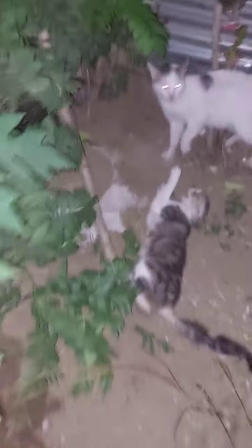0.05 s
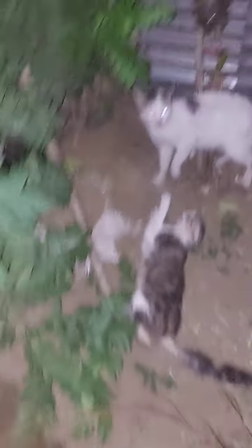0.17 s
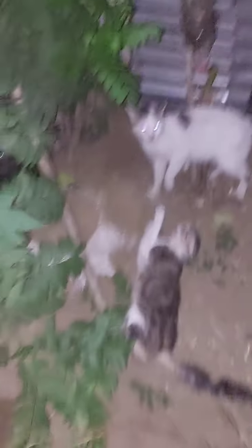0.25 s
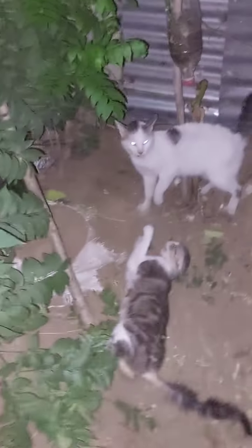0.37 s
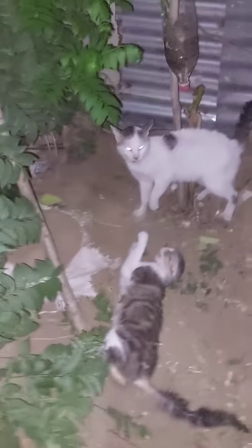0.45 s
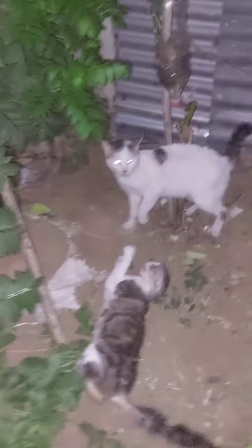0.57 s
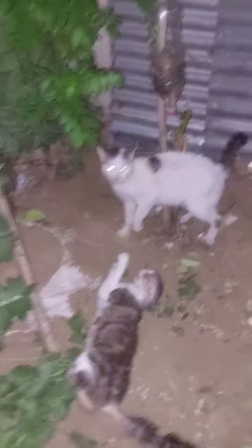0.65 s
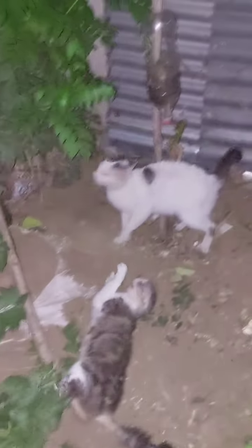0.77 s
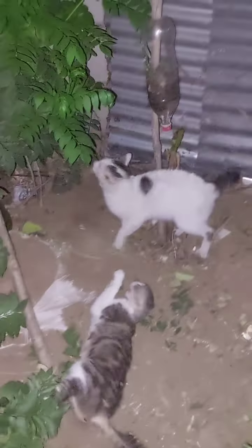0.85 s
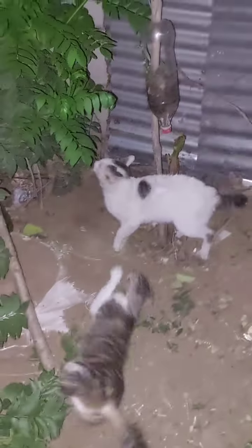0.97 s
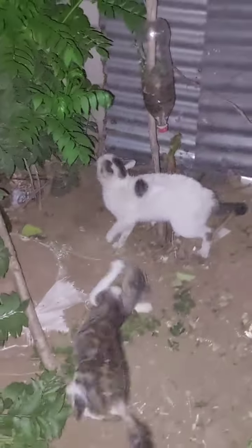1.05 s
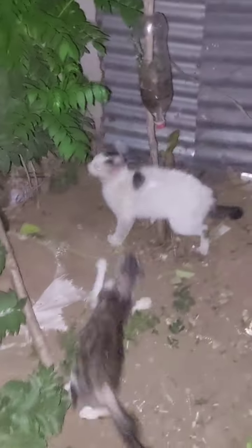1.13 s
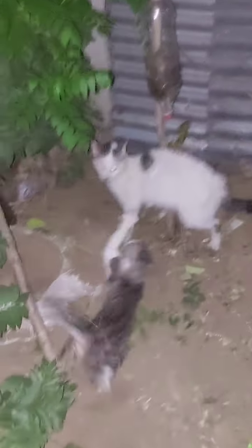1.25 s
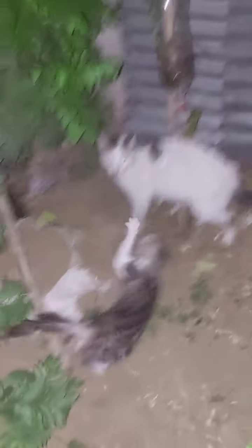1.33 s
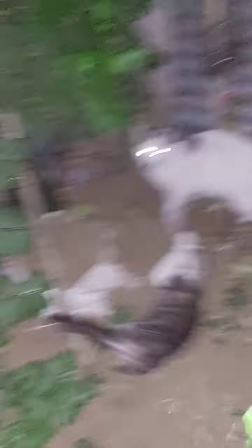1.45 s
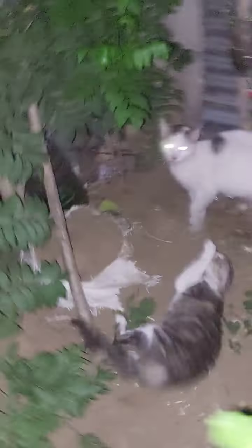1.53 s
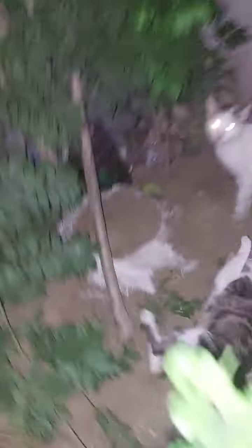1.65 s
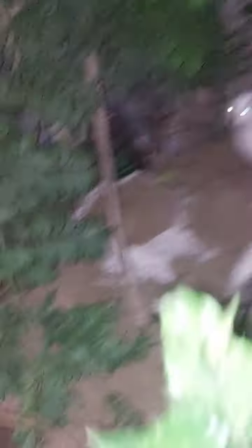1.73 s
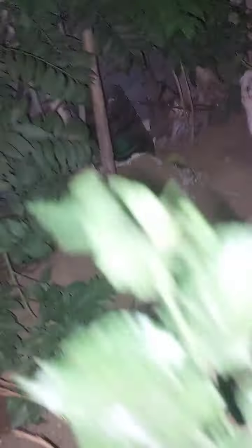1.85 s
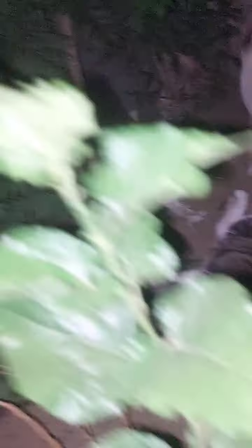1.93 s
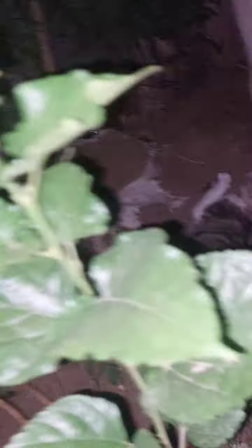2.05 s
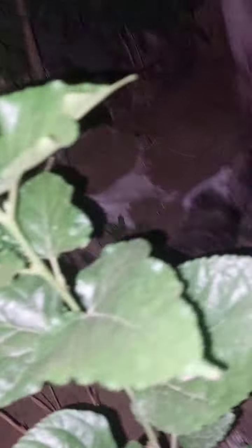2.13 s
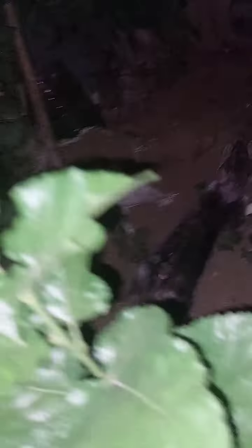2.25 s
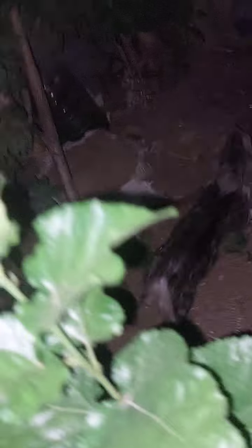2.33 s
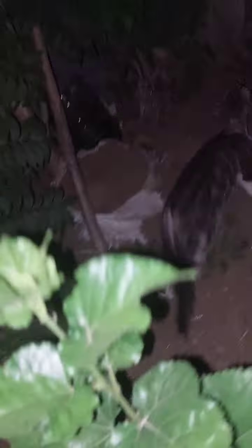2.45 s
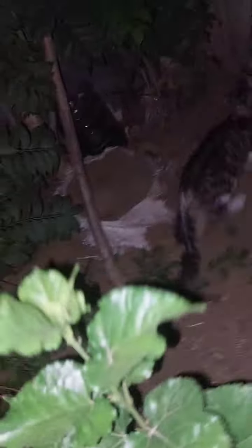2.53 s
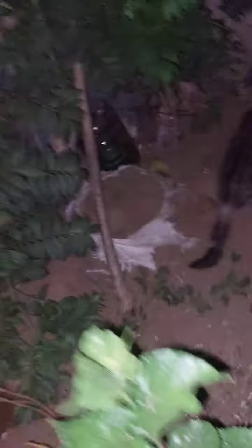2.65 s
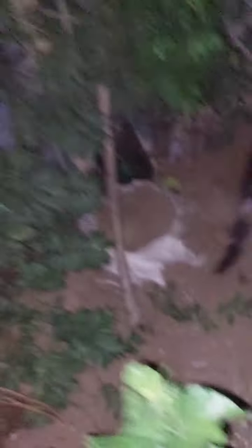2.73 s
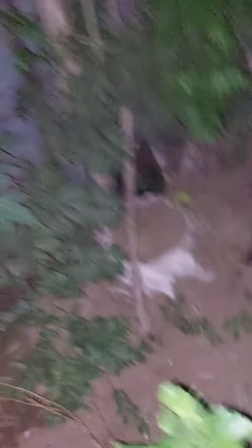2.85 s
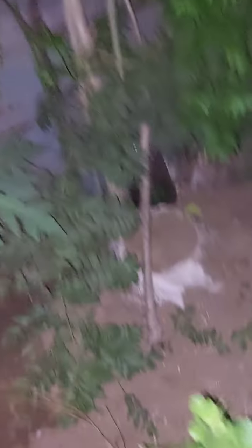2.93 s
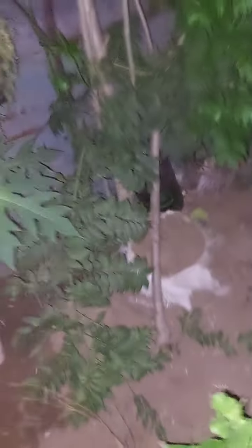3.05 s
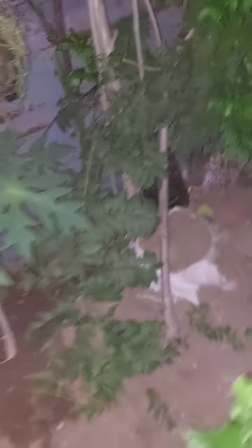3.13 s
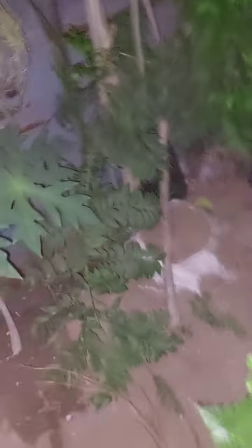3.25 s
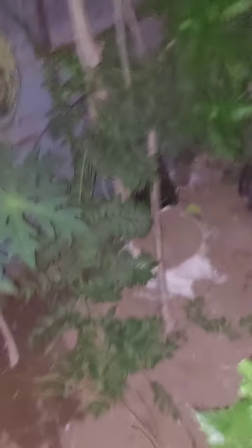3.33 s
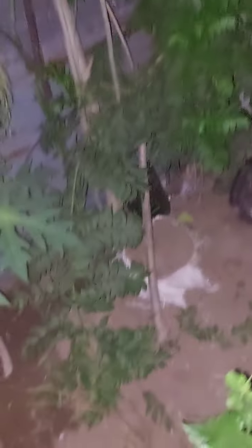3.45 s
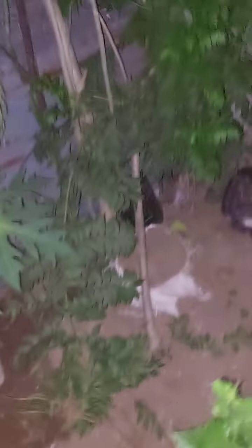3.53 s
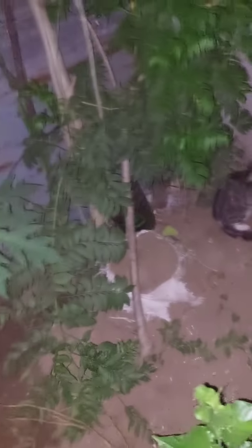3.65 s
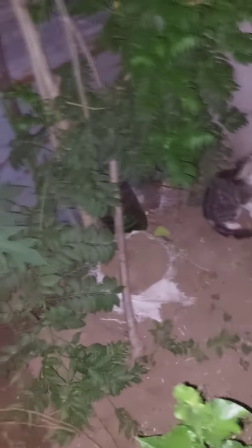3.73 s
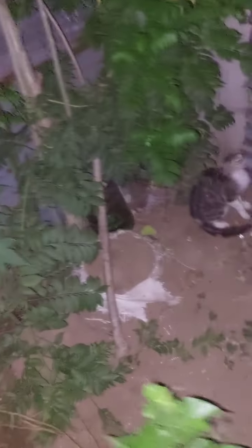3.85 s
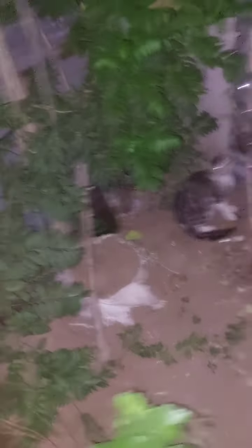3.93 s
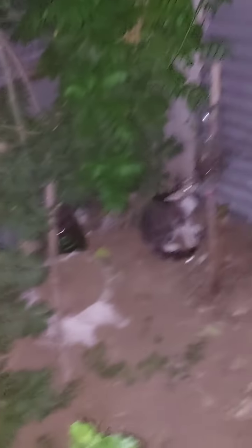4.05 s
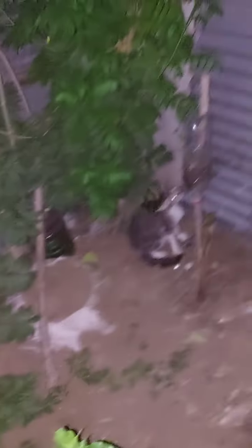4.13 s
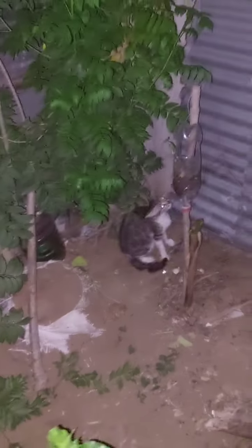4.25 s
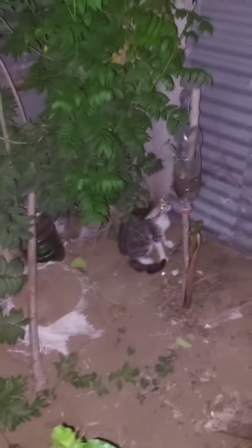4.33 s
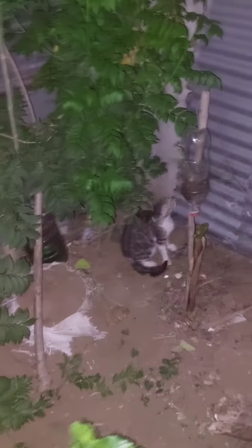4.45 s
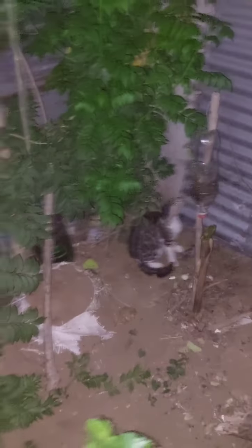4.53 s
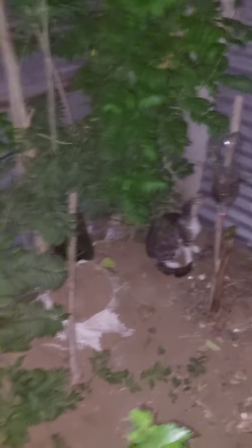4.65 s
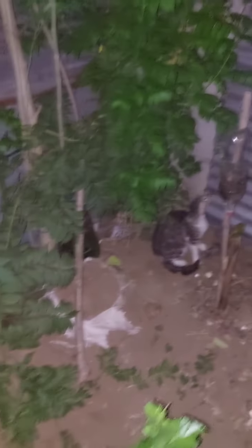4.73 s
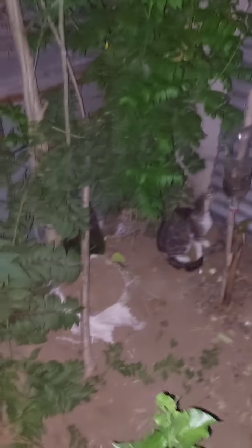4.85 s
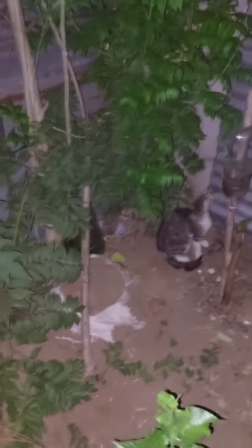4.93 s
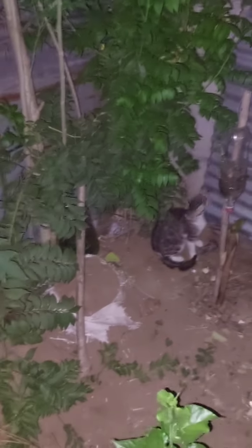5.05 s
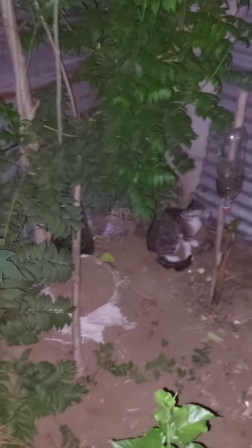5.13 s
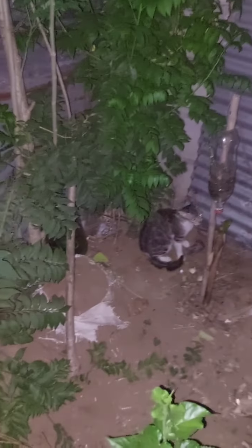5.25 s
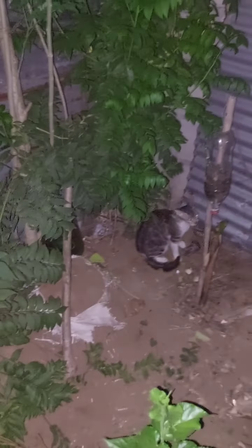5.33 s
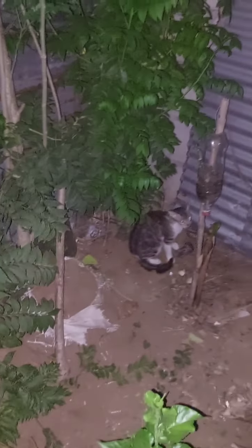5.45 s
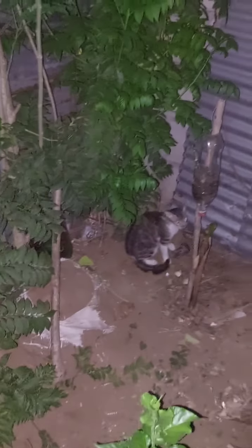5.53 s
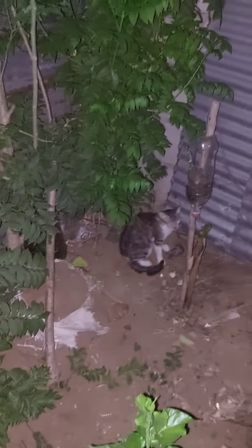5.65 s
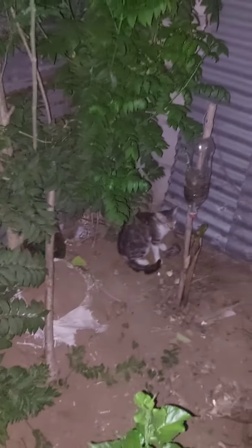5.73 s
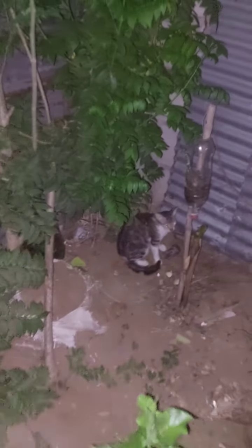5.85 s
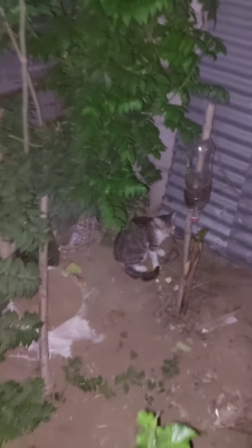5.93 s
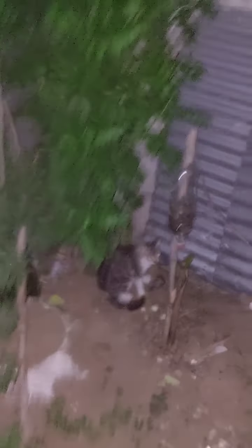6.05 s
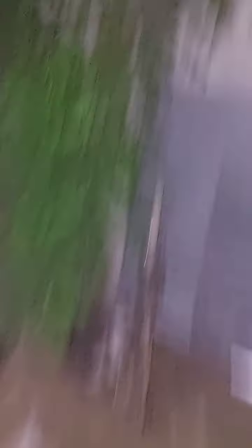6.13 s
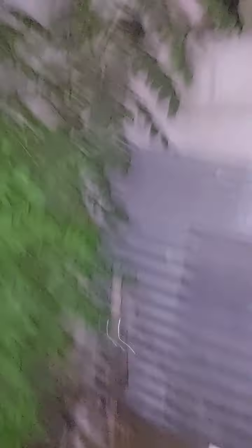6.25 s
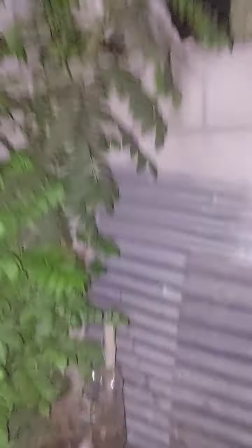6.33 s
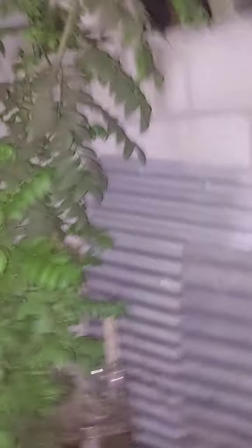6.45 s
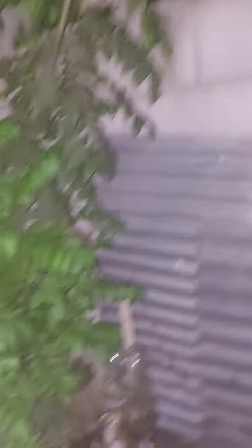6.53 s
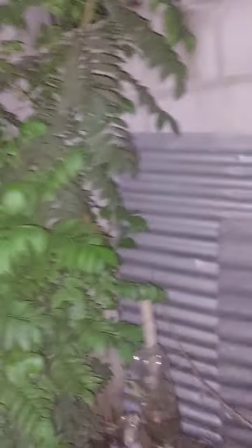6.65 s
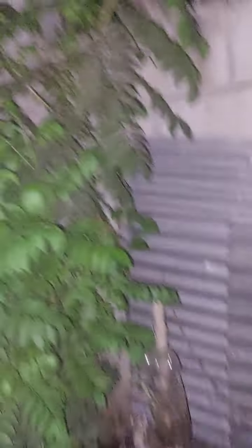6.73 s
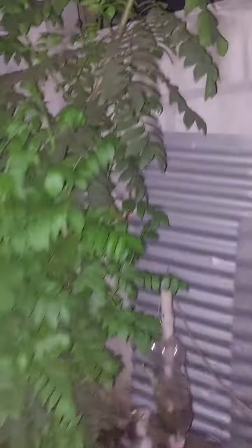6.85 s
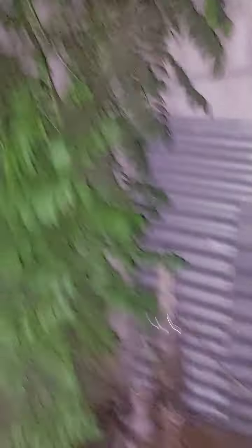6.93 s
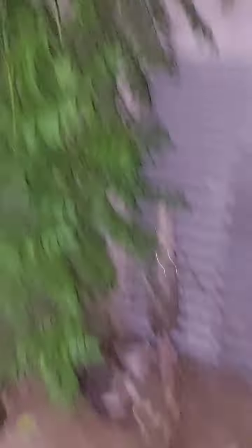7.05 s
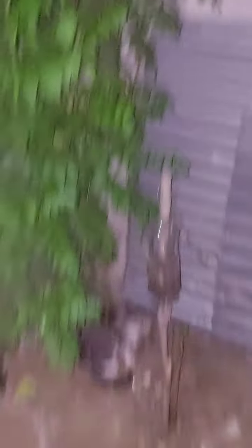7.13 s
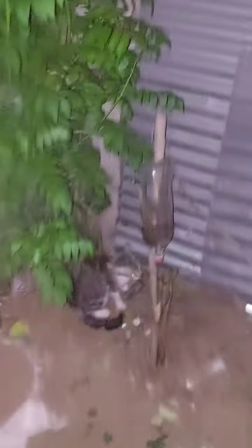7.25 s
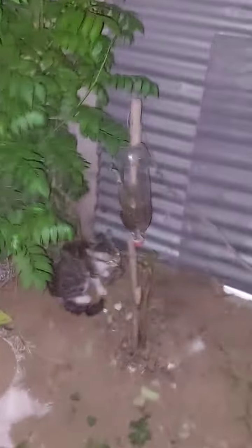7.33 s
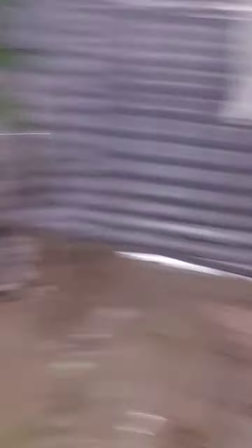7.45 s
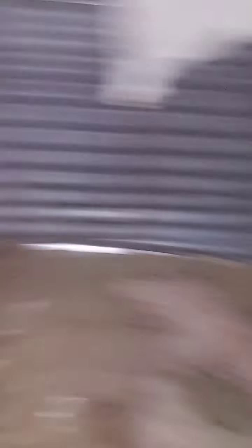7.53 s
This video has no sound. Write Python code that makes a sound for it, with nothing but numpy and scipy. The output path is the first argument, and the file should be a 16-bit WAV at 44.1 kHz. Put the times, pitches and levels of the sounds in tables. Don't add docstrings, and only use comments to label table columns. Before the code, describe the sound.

One drawn-out cat yowl, clear then rough and broken, ends in a rapid knocking on a stake. Claws and bodies slam and scrape slack sheet metal for about two seconds, ringing sharply. Afterwards the yard is quiet: crickets shimmer, a nearer one chirps, dogs bark far down an echoing street over faint traffic, and fingers bump the phone. The right channel carries everything; the left has low electronic noise.

```python
import sys
import numpy as np
from scipy import signal
from scipy.fft import rfft, irfft, next_fast_len
from scipy.io import wavfile
from scipy.ndimage import uniform_filter1d, map_coordinates

SR = 44100
rng = np.random.default_rng(int(sys.argv[2]) if len(sys.argv) > 2 else 0)


def magnitude_from_level(level_db):
    exponent = np.asarray(level_db, float) / 20
    return 10 ** exponent


def transcribe(signal):
    frames = np.atleast_2d(signal).T
    limited = np.clip(frames, -1, 1)
    pcm = np.round(limited * 32767).astype(np.int16)
    wavfile.write(sys.argv[1], SR, pcm)


N = 334260
T = np.arange(N) / SR

# [f/Hz, t60/s]
YARD_DECAY = [(200, .25), (2000, .28), (10000, .14)]
# [f/Hz, level/dB]
AIR_TREBLE = [(5290, -33.5), (9000, 4), (10500, -7.5), (12000, 2.5), (14500, -1.5), (15900, 1)]


def unit(x):
    return x / np.sqrt(np.mean(x ** 2) + 1e-20)


def along(points, hz):
    f, v = np.transpose(points)
    return np.interp(np.log(hz + 1), np.log(f + 1), v)


def curves(rows):
    s, *cols = np.transpose(rows)
    return [np.interp(T, s, c) for c in cols]


def wobble(rate):
    knots = rng.standard_normal(int(N * rate / SR) + 4)
    return map_coordinates(knots, [T * rate])


def filtered(x, response):
    m = next_fast_len(N + SR // 2)
    return irfft(rfft(x, m) * response(np.fft.rfftfreq(m, 1 / SR)), m)[:N]


def hiss(spectrum, lo_hz=0, hi_hz=SR, source=None):
    x = rng.standard_normal(N) if source is None else source

    def response(hz):
        edges = (1 + (lo_hz / (hz + 1)) ** 12) * (1 + (hz / hi_hz) ** 12)
        return magnitude_from_level(along(spectrum, hz)) / np.sqrt(edges)

    return unit(filtered(x, response))


def struck(size, spread_db, keep, patchy_db):
    z = signal.stft(rng.standard_normal(N), nperseg=size)[2]
    patches = uniform_filter1d(rng.standard_normal(z.shape), 9, 0)
    patches = unit(uniform_filter1d(patches, 9, 1))
    blows = magnitude_from_level(spread_db * rng.standard_normal(z.shape) + patchy_db * patches)
    ring = signal.lfilter([1], [1, -np.clip(keep, 0, .95)], blows ** 2, axis=1)
    return signal.istft(z * np.sqrt(ring), nperseg=size)[1][:N]


def echoes(x, decay):
    hz, t, z = signal.stft(rng.standard_normal(SR), SR, nperseg=256)
    tail = signal.istft(z * magnitude_from_level(-60 * t / along(decay, hz)[:, None]), SR, nperseg=256)[1]
    return signal.fftconvolve(x, tail / np.linalg.norm(tail))[:N]


def voice(pitch, rough, half, tract, mouth, held, shimmer_db, jitter, breath, count):
    shake = .004 * wobble(60) + jitter * rough * (wobble(45) + wobble(120)) / 1.3
    cycles = np.cumsum(pitch * (1 + shake)) / SR
    out = np.zeros(len(pitch))
    for k in np.arange(1, 2 * count + 1) / 2:
        level = held.get(k, along(tract, k * pitch))
        level = level + shimmer_db * (wobble(9) + 6 * rough * wobble(60))
        tone = np.sin(2 * np.pi * (k * cycles + rng.random()))
        out += (half if k % 1 else 1) * magnitude_from_level(level) * tone
    out /= np.sqrt(np.abs(uniform_filter1d(out ** 2, 1000)) + 1e-12)
    air = hiss(mouth) * (1 + np.cos(2 * np.pi * cycles))
    flutter = magnitude_from_level(7 * rough * wobble(260).clip(-3, 1.1))
    return out * flutter + breath * rough ** 1.5 * air


def bursts(rows, swell_db, upper_swell_db, faster):
    low, high = np.zeros(N), np.zeros(N)
    for s, swell_s, db, upper_db, dying in rows:
        on = np.clip((T - s) / .006, 0, 1)
        to_go = np.clip(1 - (T - s) / swell_s, 0, 1)
        after = (T - s - swell_s).clip(0)
        low += (on * magnitude_from_level(db - swell_db * to_go - dying * after)) ** 2
        high += (on * magnitude_from_level(db + upper_db - upper_swell_db * to_go - faster * dying * after)) ** 2
    return np.sqrt(low), np.sqrt(high)


def rings(events, crack, lift_db, spread, loose):
    out, t = np.zeros(N + SR), np.arange(SR // 2) / SR
    for s, db, hz, t60 in events:
        modes_hz = hz * (1 + spread * rng.standard_normal((24, 1)))
        ring = np.sin(2 * np.pi * (modes_hz * t + loose * rng.random((24, 1)))).sum(0) / 4.5
        ring *= magnitude_from_level(-60 * t / t60 + 3 * wobble(250)[:len(t)])
        ring *= 1 - np.exp(-hz * t / 12)
        snap = crack * .06 / t60 * rng.standard_normal(len(t)) * magnitude_from_level(-60 * t / .01)
        out[round(s * SR):][:len(t)] += magnitude_from_level(db + lift_db) * (ring + snap)
    return out[:N]


def yowl():
    # [t/s, pitch f/Hz, level/dB, mouth opening/dB]
    wail = [
        (0, 575.6, -24.5, -3),
        (.134, 547, -25, 2.5),
        (.2, 552.8, -23, -8),
        (.332, 541, -29.5, 1),
        (.49, 532.4, -28, -1.5),
        (.655, 538.7, -29, 7),
        (.74, 562.6, -24, 1),
        (.9, 703.4, -24.5, -6.5),
        (.957, 810.5, -23.5, -3),
    ]
    # [t/s, from f/Hz, to f/Hz, level/dB, mouth opening/dB]
    breaks = [(.962, 802, 766.3, -26, 0), (.972, 694, 625.6, -30, -0.5), (1.011, 633, 590.5, -30.5, 1.5),
              (1.044, 595.6, 617, -28, -3), (1.065, 606, 610.6, -33, 0), (1.09, 625.4, 670, -27.5, -4),
              (1.112, 648.6, 698.2, -28, -5.5), (1.138, 395.6, 405.6, -26, -8.5),
              (1.193, 594, 611.2, -26.5, -4), (1.212, 561.5, 540, -24, 3.5),
              (1.232, 572, 616.6, -25.5, -3.5), (1.258, 601.4, 555.8, -28, 7.5),
              (1.292, 522, 509.3, -25, -2.5)]
    # [t/s, added roughness 0-1]
    jolts = [(.752, .16), (.79, .1), (.825, .08), (.94, .25), (.968, .15), (1.09, .06), (1.134, .38),
             (1.165, .3), (1.215, .14), (1.255, .33), (1.285, .25)]
    # [f/Hz, level/dB]
    throat = [(200, -66), (340, -11.5), (540, -31), (1080, -24.5), (1500, -12.5), (1700, 3), (2050, 4.5),
              (2300, -16.5), (3300, -36.5), (3900, -54.5), (5000, -36.5), (6300, -53), (10000, -74.5),
              (12800, -55.5), (15000, -64)]
    # [f/Hz, level/dB]
    scream = [(300, -28), (600, -27), (1200, -17), (1650, 0), (1950, 3), (2250, -5), (2600, -13),
              (3300, -14), (3900, -22), (4400, -32), (5000, -23), (5500, -30), (6300, -46), (9000, -56)]
    # [f/Hz, level/dB]
    snarl = [(200, -53), (350, -26), (900, -30), (1600, -2), (2100, -5), (2600, -21), (3500, -7),
             (4200, -17), (5200, -24), (9000, -42)]
    open_mouth = {4: -20, 5: -18.5, 6: -20.5, 7: -38, 8: -39.5, 9: -33.5}
    end_s, hoarse_s, ease_s = 1.31, .745, .045

    ends = [row[0] for row in breaks[1:]] + [end_s]
    path = list(wail)
    for (s, hz, end_hz, db, wide), end in zip(breaks, ends):
        path += [(s, hz, db, wide), (end - 1e-4, end_hz, db, wide)]
    pitch, db, open_db = uniform_filter1d(curves(path), size=220)
    last_s = breaks[-1][0]
    db += -3 * np.clip((T - last_s) / (end_s - last_s), 0, 1)

    jolt = sum(size * (T > s) * np.exp(-(T - s).clip(0) / ease_s) for s, size in jolts)
    jolt = uniform_filter1d(jolt, size=600)
    turned = np.clip((T - hoarse_s) / ease_s, 0, 1)
    rough = .015 + .11 * turned + jolt

    held = {}
    for k in np.arange(1, 33) / 2:
        clear = open_mouth[k] + open_db if k in open_mouth else along(throat, k * pitch)
        upper = np.clip(k * pitch / 600 - 3, 0, 1) * np.clip(8 - k * pitch / 600, 0, 1)
        hoarse = along(scream, k * pitch) + open_db * upper
        held[k] = turned * hoarse + (1 - turned) * clear
    gate = np.clip((end_s + .01 - T) * 200, 0, 1)
    cry = voice(pitch, rough, .8 * jolt, throat, snarl, held, shimmer_db=2, jitter=.06, breath=.65, count=27)
    return gate * magnitude_from_level(db) * cry


def shaken_sheet():
    # [t/s, swell/s, boom level/dB, rattle over boom/dB, dying/(dB/s)]
    shoves = [(1.398, 0.037, -44.5, 2, 193), (1.705, 0.032, -49, 5, 68.5), (1.82, 0.32, -43, 0.5, 140),
              (2.17, 0.14, -35.5, 7, 64.5), (2.25, 0.13, -32.5, 8.5, 54), (2.55, 0.036, -43, 6, 18.5),
              (2.66, 0.15, -34.5, -20.5, 62), (2.776, 0.014, -34.5, 2, 63), (2.82, 0.18, -33.5, 9, 77.5),
              (3.062, 0.019, -35.5, 7.5, 45.5), (3.18, 0.07, -24.5, 1.5, 78), (3.442, 0.0048, -40, 2, 64),
              (3.545, 0.014, -41.5, 2, 86), (3.7, 0.1, -40.5, 1.5, 69)]
    # [t/s, swell/s, scrape level/dB, jingle over scrape/dB, dying/(dB/s)]
    rakes = [(1.395, 0.05, -55, 0, 260), (1.702, 0.0071, -46.5, 2.5, 101.5), (1.74, .03, -64, 10, 124),
             (1.82, 0.34, -46, 0.5, 64), (2.168, 0.013, -30, 6, 63.5), (2.2, 0.045, -27, 1.8, 77),
             (2.3, 0.071, -28.5, 2.5, 131), (2.545, .055, -40.5, 7, 88.5), (2.775, .004, -47.5, -13.5, 60),
             (2.805, 0.13, -30, -4, 114.5), (2.9, 0.043, -27.5, -13, 269), (3.062, 0.0091, -32, -6, 119.5),
             (3.18, .06, -32.5, -1.5, 147), (3.442, .006, -40.5, 6.5, 212.5),
             (3.545, .012, -47.5, -0.5, 155), (3.7, 0.027, -49.5, 4, 60.5), (3.74, 0.028, -39.5, -4.5, 119)]
    # [f/Hz, level/dB]
    ribs = [(350, -32.5), (600, -14.5), (758, 0), (1680, -2), (1980, 0), (2570, -8), (3930, 2.5),
            (7280, -10), (8230, -22.5), (12800, -15.5), (15900, -30.5)]
    # [f/Hz, level/dB]
    slack = [(18, -58), (30, -35), (60, -6), (123, -11), (226, -0.5), (678, -7.5), (800, -19),
             (1040, -34.5), (1760, -120)]
    boom_gain, rattle_gain = bursts(shoves, swell_db=6, upper_swell_db=11, faster=1.81)
    scrape_gain, jingle_gain = bursts(rakes, swell_db=8.5, upper_swell_db=8.5, faster=1.37)
    grit = magnitude_from_level(1.9 * wobble(50) + 1.4 * wobble(700) + 8 * (wobble(500) - 2).clip(0, .8))
    boom = hiss(slack, 0, 700, struck(size=1024, spread_db=2.5, keep=.4, patchy_db=1.5))
    boom *= magnitude_from_level(2.5 * wobble(30))
    rattle = hiss(ribs, 700, 2800, struck(size=512, spread_db=3.5, keep=.6, patchy_db=3)) * np.sqrt(grit)
    scrape = hiss(ribs, 2800, 8500, struck(size=512, spread_db=3.5, keep=.6, patchy_db=3.2)) * grit
    jingle = hiss(ribs, 8500, SR, struck(size=256, spread_db=4, keep=.75, patchy_db=3)) * grit
    shoved = boom_gain * unit(boom) + rattle_gain * unit(rattle)
    return shoved + scrape_gain * unit(scrape) + jingle_gain * unit(jingle)


def fence_contacts():
    # [t/s, peak level/dB, ring f/Hz, t60/s]
    stake = [
        (1.4068, -28, 1445, 0.015),
        (1.4176, -29.5, 1460, 0.039),
        (1.4324, -20.5, 1570, 0.012),
        (1.4443, -25.5, 1750, 0.011),
        (1.4527, -30.5, 1650, 0.024),
        (1.5409, -44, 1280, 0.0097),
    ]
    # [t/s, peak level/dB, ring f/Hz, t60/s]
    claws = [(1.708, -26, 2050, 0.014), (1.7659, -15.5, 11600, 0.014), (1.8855, -37.5, 4040, 0.2),
             (1.9071, -32, 2180, 0.06), (2.18, -11.5, 11450, 0.13), (2.1803, -12.5, 7310, .08),
             (2.1987, -11.5, 3770, 0.2), (2.205, -11.5, 6276, .15), (2.2596, -12, 10300, 0.3),
             (2.285, -10.5, 10170, .2), (2.26, -9.5, 12300, .04), (2.2, -13.5, 12180, .15),
             (2.2855, -10, 5260, .08), (2.29, -15.5, 7090, .2), (2.355, -10.5, 2051, .15),
             (2.385, -12.5, 1970, .15), (2.435, -23, 4960, .25), (2.5739, -20, 7500, .15),
             (2.59, -23, 6400, .2), (2.585, -20.5, 13170, .1), (2.6642, -31, 3180, .06),
             (2.69, -27, 12800, .2), (2.7006, -27, 3086, .06), (2.8163, -20.5, 4690, .15),
             (2.8333, -19.5, 2730, .12), (2.93, -14.5, 4080, 0.29), (2.962, -11, 2048, 0.34),
             (2.945, -15.5, 4980, .2), (2.97, -17, 2950, 0.29), (3.2379, -23.5, 3060, .12),
             (2.3523, -5, 11700, 0.11), (2.386, -4.5, 12960, 0.16), (2.5488, -25, 9230, 0.17),
             (2.6349, -16.5, 12170, 0.015), (2.779, -27.5, 1930, 0.05), (2.814, -19.5, 1700, 0.18),
             (2.8971, -23, 4797, 0.7), (3.0701, -20.5, 2023, 0.22), (3.1857, -17, 2065, 0.1),
             (3.4439, -26, 4790, 0.12), (3.5558, -34, 1850, 0.17), (3.722, -35, 7380, 0.25),
             (3.7883, -36, 2060, 0.062), (3.8861, -32.5, 3920, 0.1), (3.928, -49.5, 3800, 0.16),
             (4.165, -36.5, 3700, 0.0067)]
    # [t/s, peak level/dB, ring f/Hz]
    tips = [(1.7175, -29, 4300), (1.7514, -28, 4800), (1.7655, -17, 8000), (1.9051, -28, 2900),
            (2.1694, -24, 6000), (2.7766, -27.5, 3900), (2.816, -26.5, 4670), (2.3575, -9.5, 11200),
            (2.3925, -7, 12700), (3.63, -22, 4500), (1.3, -30, 2600), (4.13, -52, 4530),
            (3.9594, -45.5, 3470), (4.0594, -49, 4010), (4.37, -50.5, 4690)]
    # [t/s, peak level/dB, ring f/Hz, t60/s]
    low_rings = [
        (1.403, -28, 289, .15),
        (1.44, -36, 252, .15),
        (1.752, -34, 345, .1),
        (1.85, -36.5, 273.5, .4),
        (2.07, -30, 276.5, .4),
        (2.695, -23, 249, .2),
        (2.78, -22, 332, .2),
        (3.2, -24.5, 275, .3),
    ]
    out = rings(claws, crack=.11, lift_db=-9, spread=.028, loose=.5)
    out += rings(stake, crack=.015, lift_db=-1, spread=.04, loose=0)
    out += rings([(s, db, hz, .02) for s, db, hz in tips], crack=.15, lift_db=-4, spread=.13, loose=1)
    return out + rings(low_rings, crack=0, lift_db=-2, spread=.04, loose=.97)


def hand():
    # [t/s, swell/s, thud level/dB, brush over thud/dB, dying/(dB/s)]
    shifts = [
        (6.205, .03, -45, -3.5, 88),
        (6.25, .168, -26.5, -34.5, 797),
        (6.7, 0.039, -55, 3.5, 100),
        (6.99, .056, -46, -25.5, 269.5),
    ]
    # [t/s, peak level/dB, ring f/Hz, t60/s]
    taps = [
        (6.322, -41.5, 1310, 0.13),
        (6.193, -44.5, 2100, .03),
        (6.217, -42, 3820, 0.032),
        (6.24, -48.5, 2400, 0.039),
        (6.24, -45.5, 1610, 0.059),
        (6.73, -45, 2330, .08),
        (7.02, -46.5, 700, 0.091),
        (7.03, -41, 220, .12),
    ]
    # [f/Hz, level/dB]
    skin = [(530, -13.5), (900, -4), (1320, -6), (1620, -3.5), (2650, -12.5), (3900, -9), (6300, -13.5),
            (7550, -4), (8410, -15.5), (15900, -16)]
    # [f/Hz, level/dB]
    case = [(15, -41), (25, 1), (139, -4), (221, -18.5), (339, -28), (476, -57), (500, -33), (650, -58),
            (1100, -120)]
    press, slide = bursts(shifts, swell_db=16.5, upper_swell_db=10, faster=2.5)
    thud = press * magnitude_from_level(1.9 * wobble(25)) * hiss(case)
    brush = hiss(skin, source=struck(size=256, spread_db=2.5, keep=.6, patchy_db=2.5))
    brush *= magnitude_from_level(3 + 1.5 * wobble(80))
    fanned = magnitude_from_level(-11) * hiss(AIR_TREBLE)
    return thud + slide * (brush + fanned) + rings(taps, crack=.1, lift_db=3.5, spread=.029, loose=.87)


def barks():
    # [t/s, swell/s, chest level/dB, open mouth over chest/dB, dying/(dB/s)]
    calls = [
        (5.11, 0.05, -45.5, -3, 231),
        (5.545, 0.041, -38.5, -11, 108),
        (5.72, 0.113, -48.5, -12, 161),
        (6.59, 0.09, -45.5, -7, 239),
    ]
    # [f/Hz, level/dB]
    muzzle = [(180, -57), (330, -48), (450, 5), (650, 11), (850, 16.5), (1100, 13), (1400, -20.5),
              (1800, -7), (2300, -30), (4000, -30)]
    # [f/Hz, level/dB]
    round_muzzle = [(180, -52), (330, -21), (450, -15.5), (560, 0), (670, 1.5), (870, 6), (1100, -11),
                    (1450, -19), (1800, -21), (2300, -33.5), (2700, -46), (4000, -56)]
    round_s, whine_s, end_s = 5.45, 5.72, 6.3
    gains = bursts(calls, swell_db=14, upper_swell_db=17, faster=.61)
    chest, mouth = uniform_filter1d(gains, size=900)
    whine = np.clip((T - whine_s) * 40, 0, 1) * (T < end_s)
    pitch = 221 + 50 * whine + 6 * wobble(8)
    long = (T > round_s) * (T < end_s)
    held = {}
    for k in np.arange(1, 25) / 2:
        held[k] = np.where(long, along(round_muzzle, k * pitch), along(muzzle, k * pitch))
    rough = np.where(long, .3, .35)
    half = uniform_filter1d(np.where(long * (T > whine_s), .25, .64), size=1500)
    bark = voice(pitch, rough, half, muzzle, muzzle, held, shimmer_db=3, jitter=.087, breath=.7, count=12)
    flat = [(1, 0)]
    return chest * hiss(flat, 0, 668, bark) + mouth * hiss(flat, 1307, SR, bark)


def howls():
    # [t/s, length/s, start f/Hz, end f/Hz, level/dB]
    cries = [(4.22, .33, 820, 870, -69), (4.37, .1, 900, 880, -67), (4.52, .13, 1190, 1070, -68),
             (4.19, .14, 2330, 2330, -71), (4.53, .09, 2300, 2300, -71), (4.69, .1, 2250, 2400, -74),
             (4.77, .17, 628, 596, -66), (4.865, .2, 1500, 1370, -63), (4.87, .07, 4280, 4150, -70),
             (4.38, .06, 4050, 4250, -75), (4.69, .1, 4650, 4350, -72), (4.39, .05, 2100, 2000, -75),
             (4.99, .1, 4200, 4280, -75), (4.68, .07, 1130, 1180, -67), (4.73, .13, 1300, 1350, -73),
             (1.6, .11, 1850, 2000, -67), (0.034, .1, 890, 870, -54), (.2, .18, 870, 900, -63.5),
             (5.04, .055, 1150, 1064, -59), (1.4, .09, 900, 880, -57), (6.1, .1, 830, 800, -67),
             (6.38, .12, 600, 620, -63), (6.34, .14, 1250, 1150, -65), (6.95, .07, 600, 600, -65),
             (7.03, .15, 820, 790, -62), (7.2, .19, 800, 790, -67), (7.335, .12, 616, 590, -62),
             (7.42, .16, 1350, 1250, -69), (7.44, .12, 2000, 2000, -71)]
    out = np.zeros(N)
    for start, length, hz, end_hz, level_db in cries:
        u = np.clip((T - start) / length, 0, 1)
        glide = (hz + (end_hz - hz) * u) * (1 + .012 * wobble(35) + .022 * wobble(150))
        broken = magnitude_from_level(5 * wobble(25).clip(-3, 1))
        swell = np.sqrt(np.sin(np.pi * u).clip(0))
        out += magnitude_from_level(level_db) * broken * swell * np.sin(2 * np.pi * np.cumsum(glide) / SR)
    return out


def dogs():
    # [f/Hz, t60/s]
    street = [(300, 0.25), (2000, 0.41), (6000, 0.12)]
    far = barks() + howls()
    return far + magnitude_from_level(-1) * echoes(far, street)


def cricket_chorus():
    # [t/s, level/dB]
    chorus = [(0, -64), (1.062, -63), (1.314, -58.5), (1.68, -66.5), (4.12, -64), (4.66, -61), (6.33, -57),
              (7.58, -61)]
    # [f/Hz, level/dB]
    wings = [(3060, -49.5), (5200, -25.5), (5650, -32), (5950, -34.5), (6960, -4), (7380, 0.5), (8150, -2),
             (8370, -26), (8520, -11), (9170, -18), (10500, -25.5), (13600, -68), (22000, -120)]
    db, = curves(chorus)
    turn = (T - 5.883) / .0938 % 1

    def buzz(start, life):
        return np.clip((turn - start) * 25, 0, 1) * np.clip((start + life - turn) * 6, 0, 1)

    high = hiss(wings, 7750, 8150, hiss(wings, 7600, 8150))
    sunk = hiss(wings, 6900, 7700)
    solo = buzz(start=0, life=.45) * high + magnitude_from_level(-4) * buzz(start=.12, life=.55) * sunk
    solo *= magnitude_from_level(2 * wobble(3) + 1.5 - 6 * np.clip(1.5 - T / 3, 0, 1))
    far = magnitude_from_level(-3) * hiss(wings, 0, 7500, hiss([(1, 0)], 0, 7800)) + magnitude_from_level(-13) * hiss(wings, 8000)
    return magnitude_from_level(db + .5 + 1.2 * wobble(200)) * (magnitude_from_level(1.4 * wobble(3.2)) * far + solo)


def near_cricket():
    # [t/s, peak level/dB]
    chirps = [
        (4.41, -58),
        (4.484, -56),
        (4.868, -63),
        (5.46, -63),
        (5.53, -51),
        (5.604, -50),
        (6.45, -63),
        (6.52, -54),
        (7.175, -61),
        (7.245, -54),
    ]
    t = np.arange(SR // 14) / SR
    strokes = np.sin(np.pi * 75 * t) ** 2 * np.sin(np.pi * t / t[-1]) ** 2
    chirp = strokes * np.sin(2 * np.pi * (3580 * t - 4000 * t ** 2))
    out = np.zeros(N)
    for s, level_db in chirps:
        out[round(s * SR):][:len(t)] += magnitude_from_level(level_db - 2 + 3 * wobble(120)[:len(t)]) * chirp
    return out + magnitude_from_level(-9) * echoes(out, YARD_DECAY)


def night():
    # [t/s, traffic level/dB, breeze level/dB]
    bed = [(0, -86, -61.5), (.7, -81, -66.5), (4.05, -57, -73), (4.3, -68.5, -78), (4.45, -66, -74),
           (4.75, -62.5, -69), (5.1, -60.5, -70.5), (5.35, -56.5, -81.5), (6.17, -57, -83.5),
           (7.3, -61, -79.5), (7.58, -60.5, -75.5)]
    # [f/Hz, level/dB]
    traffic = [(15, -45), (25, 1), (112, 1.5), (200, -8.5), (649, -14.5), (1070, -15.5), (1460, -29.5),
               (2310, -31.5), (2500, -38.5), (3250, -51), (5500, -120)]
    # [f/Hz, level/dB]
    foliage = [(880, -11.5), (1500, -12.5), (1660, -13), (2290, -10.5), (3240, -17), (4720, -13),
               (5750, -26.5), (7430, -7), (8530, -23), (15900, -33.5)]
    hum_db, rustle_db = curves(bed)
    hum = magnitude_from_level(hum_db + .6 * wobble(1.2)) * hiss(traffic)
    leaves = hiss(foliage, 0, 6000, struck(size=512, spread_db=2.5, keep=.6, patchy_db=3))
    rustle = magnitude_from_level(rustle_db + 3.5 + 2.8 * wobble(12)) * leaves
    return hum + rustle + magnitude_from_level(-73.5 + 1.2 * wobble(15)) * hiss(AIR_TREBLE)


def dead_port():
    # [t/s, level/dB]
    drift = [(0, -69), (.75, -69.5), (1.4, -62), (1.8, -62), (4.4, -60.5), (4.75, -54.5), (7.58, -54.5)]
    # [f/Hz, level/dB]
    circuit = [(20, -14), (45, -3), (90, 0), (170, -3), (350, -8), (700, -14), (1400, -21), (2750, -28),
               (5500, -38), (7300, -45), (15800, -47)]
    return magnitude_from_level(curves(drift)[0] + .91 * wobble(13)) * hiss(circuit)


def scene():
    cat = yowl()
    right = cat + magnitude_from_level(-14) * echoes(cat, YARD_DECAY)
    right += shaken_sheet() + fence_contacts() + hand()
    right += dogs() + cricket_chorus() + near_cricket() + night()
    return np.array([dead_port(), 2 * right])


def top_cut(x):
    return signal.sosfilt(signal.butter(12, 16460, fs=SR, output="sos"), x)


def record(dry):
    def band(hz):
        return (hz < 15900) * hz ** 2 / (hz ** 2 + 45 ** 2)

    mix = np.array([filtered(x, band) for x in dry])
    return top_cut(mix)


dry = scene()
out = record(dry)
transcribe(out)
```